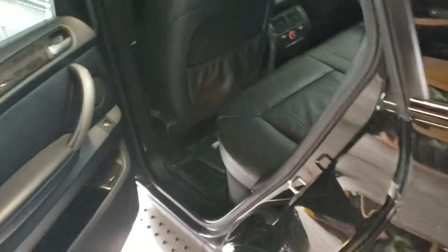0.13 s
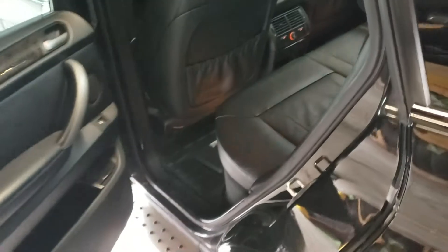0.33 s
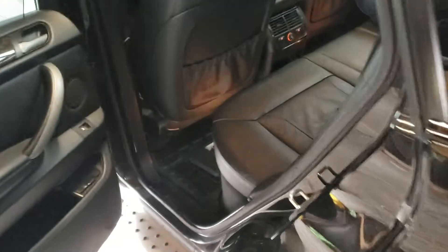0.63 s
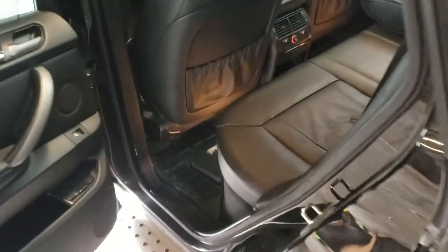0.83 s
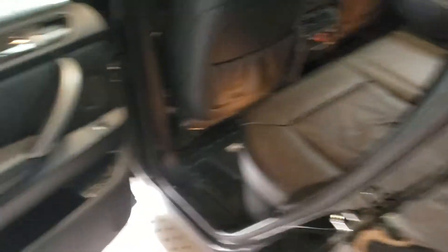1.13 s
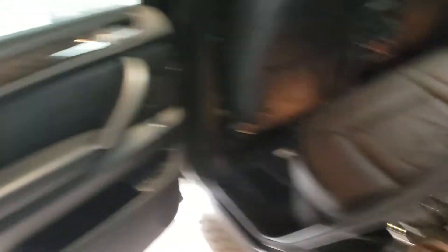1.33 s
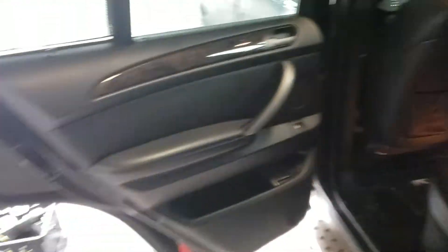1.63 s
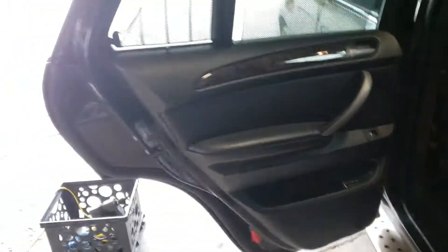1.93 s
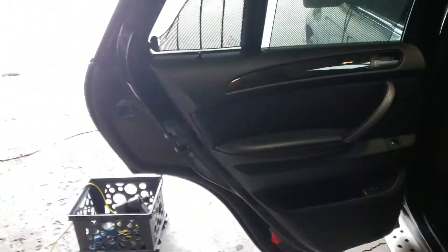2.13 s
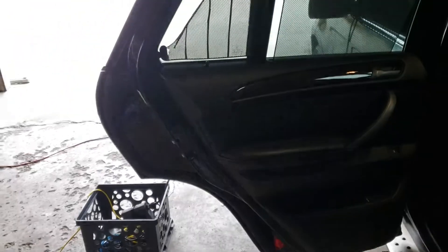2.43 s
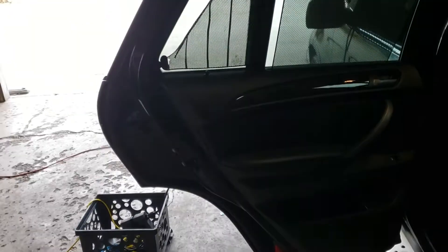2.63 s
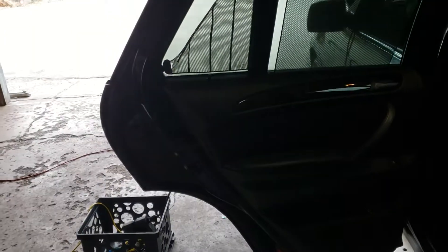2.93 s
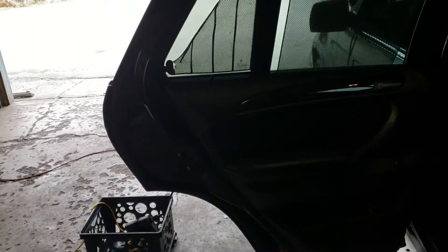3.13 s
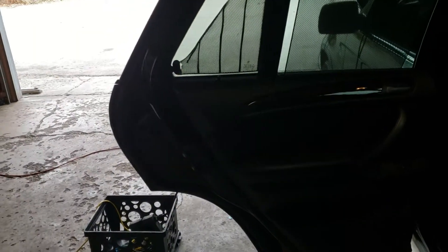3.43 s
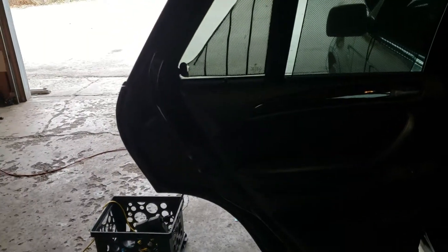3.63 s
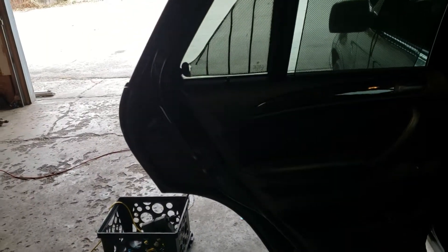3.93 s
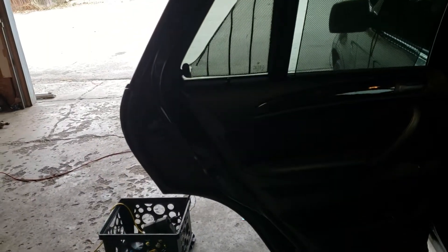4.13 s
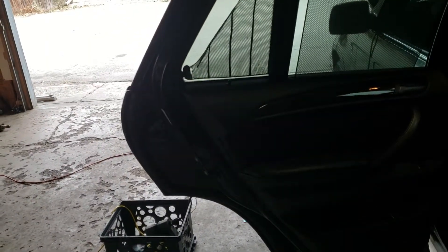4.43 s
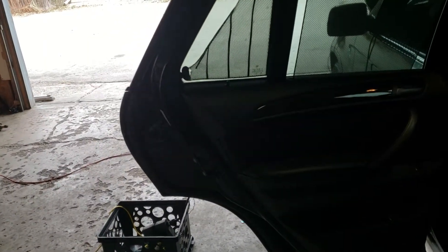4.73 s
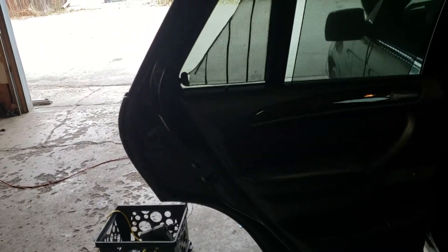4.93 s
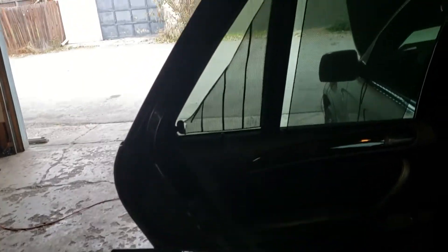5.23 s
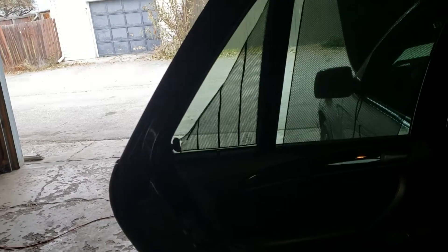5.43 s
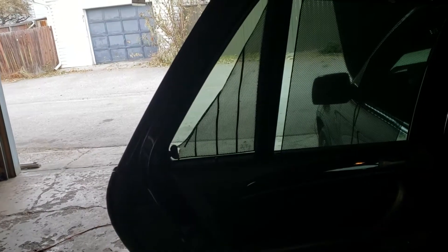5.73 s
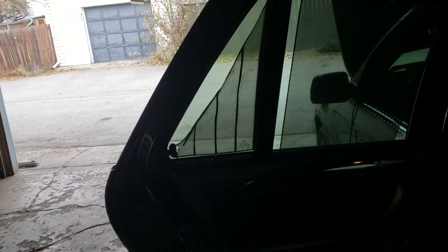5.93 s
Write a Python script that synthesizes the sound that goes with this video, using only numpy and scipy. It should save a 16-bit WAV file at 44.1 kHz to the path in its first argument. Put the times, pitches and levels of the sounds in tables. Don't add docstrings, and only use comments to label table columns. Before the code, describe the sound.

A large engine idles roughly in an open garage, its uneven bass thump beating five times a second under fan roar, while a shoe scuffs concrete.

```python
import sys
import numpy as np
from scipy import signal
from scipy.fft import rfft, irfft, next_fast_len
from scipy.io import wavfile
from scipy.ndimage import uniform_filter1d

SR = 44100
rng = np.random.default_rng(int(sys.argv[2]) if len(sys.argv) > 2 else 0)


def store_wav(level_fs):
    pcm = np.round(np.clip(np.atleast_2d(level_fs), -1, 1) * 32767)
    wavfile.write(sys.argv[1], SR, pcm.T.astype(np.int16))


def amplitude_ratio(level_db):
    exponent = np.asarray(level_db, float) / 20
    return 10 ** exponent


N = 268304
TIME = np.arange(N) / SR


def stereo_noise():
    return rng.standard_normal((2, N))


def evened(x):
    return x / np.sqrt(np.mean(x ** 2) + 1e-20)


def read(points, hz):
    f, value = np.transpose(points)
    return np.interp(np.log(hz + 1), np.log(f + 1), value)


def follow(rows, column=1, **ends):
    rows = np.array(rows)
    return np.interp(TIME, rows[:, 0], rows[:, column], **ends)


def swell(start, length, db, rise, fall, sag_db=0):
    s = start + np.sort([0, rise, length - fall, length])
    levels_db = [db - 20, db, db + sag_db, db + sag_db - 20]
    return amplitude_ratio(np.interp(TIME, s, levels_db, left=-99, right=-99))


def ring(x, hz, width):
    return evened(signal.lfilter(*signal.iirpeak(hz, hz / width, SR), x))


def resonate(x, hz, width):
    turn = np.exp(2j * np.pi * np.cumsum(hz * np.ones(N)) / SR)
    r = np.exp(-np.pi * width / SR)
    return 2 * (turn * signal.lfilter([1 - r], [1, -r], x / turn)).real


def low_pass(x, edge_hz, order):
    size = next_fast_len(N + SR)
    hz = np.fft.rfftfreq(size, 1 / SR)
    return irfft(rfft(x, size) / np.sqrt(1 + (hz / edge_hz) ** order), size)[..., :N]


# (frequency [Hz], left-right likeness [-1 to 1])
PORT_LIKENESS = [(60, 1.0), (130, 1), (290, 0.63), (640, 0.79), (1410, -0.2), (3100, 0.051), (6820, -0.019),
                 (15000, 0.15)]
# (frequency [Hz], left over right [dB])
PORT_LEAN = [(60, 3.5), (300, 6.5), (1200, 4), (2500, 3), (4500, 3), (6300, 0.5), (7000, 15), (7500, 13.5),
             (8000, -1), (8600, -7), (10500, -2.5), (12000, -2), (13800, 1.5), (15000, 5)]


def ported(x, colour):
    size = next_fast_len(N)
    hz = np.fft.rfftfreq(size, 1 / SR)
    a, b = rfft(x, size) * amplitude_ratio(read(colour, hz))
    same = np.clip(read(PORT_LIKENESS, hz), -1, 1)
    lean_db = read(PORT_LEAN, hz)
    left = a * amplitude_ratio(lean_db / 2)
    right = (same * a + np.sqrt(1 - same ** 2) * b) * amplitude_ratio(-lean_db / 2)
    return evened(irfft(np.array([left, right]), size)[:, :N])


# (time [s], turned [0-1])
TURN = [
    (0, 0.12),
    (1.15, 0),
    (1.8, 0.84),
    (2.3, 0.81),
    (6.1, 0.81),
]


def camera_turn(at=TIME):
    return np.interp(at, *np.transpose(TURN))


# (time [s], blow strength [dB], extra swing of the middle boom [dB])
BEATS = [(0.1677, -0.8, 2.5), (0.3721, -1.7, -3.5), (0.5686, -1, 1), (0.77, -0.5, -2.5), (0.9747, -2.2, -2),
         (1.1685, -2, 2.5), (1.3861, -0.5, 1.5), (1.5827, -1.5, 6), (1.7975, 0.5, 2.5), (1.991, 0.5, 3),
         (2.195, 0.3, 0.5), (2.394, 1.3, -1), (2.5921, -1, 1.5), (2.7849, 0, 0), (2.9907, -0.6, 1.5),
         (3.1812, -0.2, 1.3), (3.3897, 0.5, 3.2), (3.5781, 2.5, 4), (3.7919, 2, 3), (3.9852, -0.5, 2.5),
         (4.1898, 1.1, 3.0), (4.3901, 0.3, 1), (4.5852, 0.8, 3.5), (4.7824, -2.5, 2), (4.9773, 0, -1),
         (5.1714, -1.2, 2.5), (5.3672, -3.3, 3), (5.5682, 0.7, 2), (5.7663, -1, -0.5), (5.9604, 2.5, -1)]


def beats():
    cycle_s, lead_in_db = .1995, -3
    first = [BEATS[0][0] - cycle_s, lead_in_db, lead_in_db]
    last = [BEATS[-1][0] + cycle_s, 0, 0]
    return np.array([first, *BEATS, last])


def pulse(lag, per_cycle=1):
    cycles = np.interp(TIME, beats()[:, 0], np.arange(len(beats())))
    return np.cos(2 * np.pi * per_cycle * (cycles - lag))


# (frequency [Hz], level [dB per Hz])
ROAR = [(150, -8), (240, -8), (380, -3.5), (454, -4), (549, -1), (656, -3.5), (748, 0), (863, -3),
        (937, -5.5), (1580, -6), (1740, -5), (2200, -8.5), (2370, -8), (4140, -15.5), (4340, -15.5),
        (6500, -18), (8450, -38), (14300, -120)]


def fan_roar(throb_db):
    level_db = -49.5 + 4 * camera_turn() + 0.18 * throb_db + 0.11 * pulse(.3)
    return amplitude_ratio(level_db) * ported(stereo_noise(), ROAR)


# (frequency [Hz], level [dB per Hz])
HISS = [(4500, -57), (6000, -4.5), (6600, -8.5), (7150, -0.5), (7550, 1), (8000, 0), (8500, -2),
        (9500, -2.5), (10500, -4), (11900, 0.5), (12800, -3.5), (13700, -9), (14800, -5), (15800, -7.5)]


def intake_hiss(throb_db):
    return amplitude_ratio(-54.5 + 2 * camera_turn() + throb_db) * ported(stereo_noise(), HISS)


# (frequency [Hz], width [Hz], level [dB])
WHINES = [(741, 26, -60.5), (890, 1.3, -61.5), (823, 10, -62)]
# (frequency [Hz], level [dB])
TONES = [(4000, -76), (6000, -79)]
# (time [s], frequency [Hz], level [dB])
CABIN_HUM = [
    (0, 480, -60),
    (1.45, 480, -61),
    (1.65, 480, -72),
]


def whines(lumps):
    out = np.zeros((2, N))
    for hz, width, db in WHINES:
        out += amplitude_ratio(db + 4 * (camera_turn() - 1)) * ring(stereo_noise(), hz, width)
    for hz, db in TONES:
        out += amplitude_ratio(db + lumps) * np.sqrt(2) * np.sin(2 * np.pi * hz * TIME)
    hum = evened(resonate(rng.standard_normal(N), follow(CABIN_HUM), 3))
    return out + amplitude_ratio(follow(CABIN_HUM, 2)) * hum


# (start [s], length [s], level [dB])
WHISTLE = (0.72, 0.93, -58.5)
# (start [s], length [s], level [dB])
FIZZ = [
    (-.2, 0.39, -50),
    (.75, .85, -60),
    (1.6, .55, -59),
]


def air_leak():
    whistle = ring(ring(stereo_noise(), 12000, 1500), 12000, 1500)
    fizz = ring(ring(stereo_noise(), 14600, 2500), 14600, 2500)
    sweeps = sum(swell(s, length, db, length / 2.5, length / 3) for s, length, db in FIZZ)
    return swell(*WHISTLE, rise=0.2, fall=0.2) * whistle + sweeps * fizz


def engine_bay():
    lumps = evened(uniform_filter1d(uniform_filter1d(rng.standard_normal(N), 1500), 1500))
    throb_db = .8 * (pulse(.45) + pulse(.1, per_cycle=2) + lumps)
    return fan_roar(throb_db) + intake_hiss(throb_db) + whines(lumps) + air_leak()


# (frequency [Hz], level [dB per Hz])
GRIT = [(290, -20), (600, -11), (954, -0.5), (1350, -5.5), (1800, 0.5), (1990, -6), (2360, -12),
        (3240, -10), (4380, -7), (5590, -9), (15500, -18)]
# (frequency [Hz], width [Hz], level [dB])
SOLE = [(978, 70, -12.5), (1490, 190, -24), (2404, 140, -9), (2830, 420, -11), (4050, 990, -12.5)]
# (start [s], length [s], level [dB])
SCUFFS = [
    (-.01, 0.097, -51),
    (0.076, 0.18, -56.5),
    (0.312, 0.099, -56.5),
    (.95, 0.34, -59.5),
]
# (time [s], pressure [dB], hollow under the sole [Hz])
DRAG = [
    (1.76, -72, 4500),
    (1.82, -54, 4450),
    (1.86, -51.5, 4300),
    (1.9, -48.5, 3000),
    (1.945, -45, 2450),
    (2.06, -52, 2600),
    (2.15, -50.5, 3600),
    (2.24, -53.5, 3020),
    (2.258, -62, 3000),
]


def scuffs_and_drag(grains):
    grit = ported(grains, GRIT) + sum(amplitude_ratio(db) * ring(grains, hz, width) for hz, width, db in SOLE)
    drag = amplitude_ratio(follow(DRAG, left=-99, right=-99))
    scuffs = sum(swell(*row, rise=0.01, fall=.03, sag_db=-6) for row in SCUFFS)
    hollow = evened(resonate(grains, follow(DRAG, 2), 500))
    return amplitude_ratio(5) * grit * (drag + scuffs) + amplitude_ratio(-7) * hollow * drag


# (frequency [Hz], width [Hz], level [dB])
TAP_RING = [(3300, 1500, 6.5), (4200, 500, -1), (4670, 850, 2.5), (5390, 1200, 4.5)]


def heel_tap(grains):
    heel = sum(amplitude_ratio(db) * ring(ring(grains, hz, width), hz, width) for hz, width, db in TAP_RING)
    contact = swell(.078, .055, -47.5, rise=.003, fall=.015)
    tail = swell(.078, .2, -48.5, rise=.003, fall=.145)
    return amplitude_ratio(-10) * heel * (contact + tail)


# (start [s], length [s], level [dB], first pitch [Hz], last pitch [Hz])
SQUEAKS = [
    (-.008, .054, -53, 13620, 13500),
    (.048, .045, -53, 13600, 13450),
    (.098, .05, -62, 14300, 12600),
]


def squeaks():
    out = np.zeros((2, N))
    for start, length, db, first_hz, last_hz in SQUEAKS:
        hz = np.interp(TIME, [start, start + length], [first_hz, last_hz])
        out += evened(resonate(stereo_noise(), hz, 18)) * swell(start, length, db, .01, .01)
    return out


def shoe():
    clumps = uniform_filter1d(rng.standard_normal(N), 150)
    grains = stereo_noise() * amplitude_ratio(2.38 * rng.exponential(1, N) + 7.7 * clumps)
    return scuffs_and_drag(grains) + heel_tap(grains) + squeaks()


# (frequency [Hz], level [dB])
PUFF = [(24, -22), (34, -6), (42, -8), (51, -3), (60, -7), (68, 1), (82, -3), (88, -10), (100, -4),
        (120, -7), (135, -6), (156, -8), (172, -17), (195, -40), (300, -100)]


def stray_puffs():
    return amplitude_ratio(-40) * ported(amplitude_ratio(4.5 * pulse(.4)) * stereo_noise(), PUFF)


# (frequency [Hz], width [Hz], level [dB])
CHUFF_RING = [(208, 31, -8), (238, 24, 0), (290.6, 25.7, -0.5), (321.6, 38, -0.5), (361, 91, -14)]
# (start [s], level [dB])
POPS = [
    (.2, -44.5),
    (1.19, -45),
    (2.21, -41.5),
    (2.4, -45.5),
    (3.44, -45),
    (4.4, -45),
    (4.96, -49.5),
    (5.18, -54),
]


def chuffs():
    gas = rng.standard_normal(N) + 0.36 * stereo_noise()
    rings = [amplitude_ratio(db) * ring(ring(gas, hz, width), hz, 3 * width) for hz, width, db in CHUFF_RING]
    steady = amplitude_ratio(-51 + 2 * pulse(.25))
    pops = sum(swell(s, .13, db, rise=0.046, fall=0.079) for s, db in POPS)
    return evened(sum(rings)) * np.hypot(steady, pops) * amplitude_ratio([[1.9], [-2.2]])


# (timing slip [firing gaps], blow [dB])
CYLINDERS = [(-0.141, -5.5), (-0.06, 5.0), (-0.387, -3.5), (-0.082, 1.7), (-0.36, -2), (-0.181, -0.3),
             (-0.133, -5.5), (-0.327, -4.5)]


def firings():
    s = beats()[:, 0]
    slip = np.array(CYLINDERS)[:, 0]
    phase = (np.arange(8) + slip) / 8
    return np.round((1 + s[:-1, None] + np.diff(s)[:, None] * phase) * SR).astype(int)


# (frequency [Hz], width [Hz], level [dB], travel [ms])
BOOMS = [(41.1, 7.66, 31.5, 14.5), (74.4, 3.3, 27.9, 4.5), (123.92, 10.8, 32, 1.42), (117.9, 21.7, 27, 5.0),
         (62.5, 6.6, 16.5, -2.5), (44.0, 7.4, 29.1, 4.5), (144.2, 4.4, 9.5, 2.5)]
SET_BY = (0, 2, 1, 1, 2, 0, 1)


def exhaust():
    fired = firings()
    blow_db = np.array(CYLINDERS)[:, 1] + .8 * rng.standard_normal(fired.shape)
    swing_db = beats()[:-1]
    swing_db[:, 0] = -2.17 + 4.36 * camera_turn(swing_db[:, 0])
    out = np.zeros(N)
    for (hz, width, db, ms), column in zip(BOOMS, SET_BY):
        blows = np.zeros(N + 2 * SR)
        blows[fired + round(ms * SR / 1000)] = amplitude_ratio(db + blow_db + swing_db[:, [column]])
        out += signal.lfilter(*signal.iirpeak(hz, hz / width, SR), blows)[SR:SR + N]
    soft = low_pass(out, 165, order=16)
    return soft * amplitude_ratio([[2.2], [-.5]])


def scene():
    return engine_bay() + shoe() + stray_puffs() + chuffs() + exhaust()


def roll_off(x):
    return signal.sosfilt(signal.butter(12, 17080, fs=SR, output="sos"), x)


def record(dry):
    trimmed = dry - low_pass(dry, 24, order=8)
    mix = low_pass(trimmed, 15790, order=600)
    return roll_off(mix)


dry = scene()
out = record(dry)
store_wav(out)
```